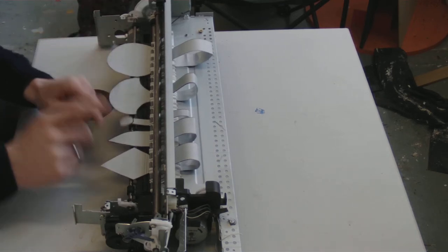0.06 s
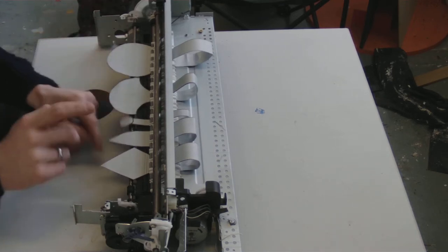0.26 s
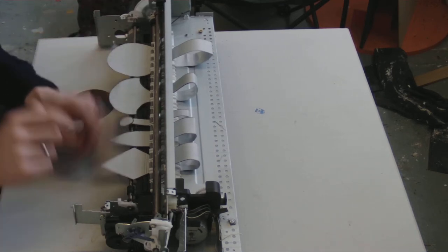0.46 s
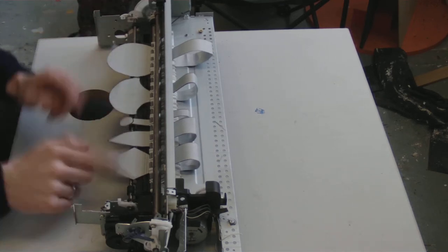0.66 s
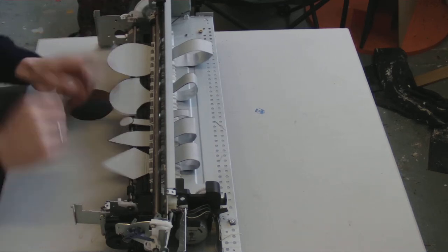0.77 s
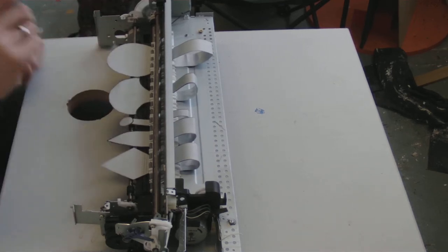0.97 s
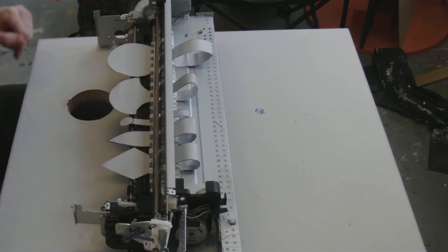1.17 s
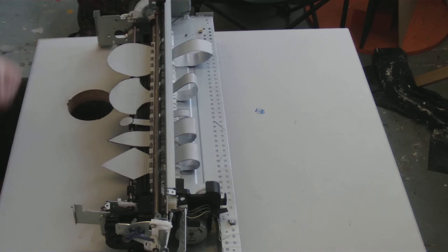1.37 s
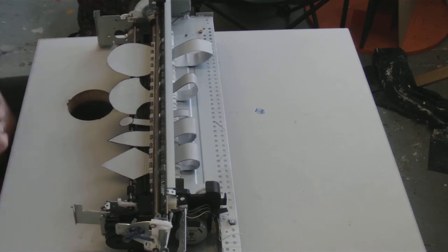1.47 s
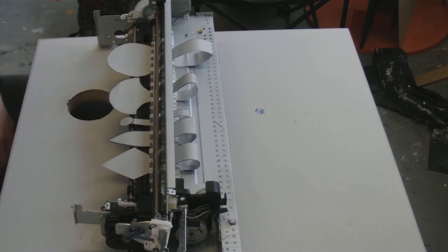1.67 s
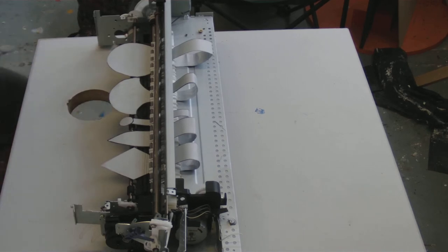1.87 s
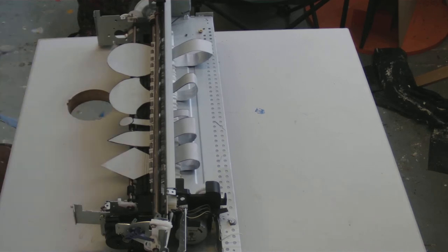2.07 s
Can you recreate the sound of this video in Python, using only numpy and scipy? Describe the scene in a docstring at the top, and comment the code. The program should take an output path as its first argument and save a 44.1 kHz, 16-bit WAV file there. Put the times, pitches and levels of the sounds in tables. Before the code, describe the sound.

Sharp clacking bursts from flicked paper and printer levers, ending in two hard metal knocks.

```python
"""Flicked paper on printer levers

Fingers flick stiff paper shapes fixed to the levers of a printer mechanism on a table.
Each flick sets off a quick rattle of dry clacks; the last ends in two knocks of the metal frame.
A spring sings faintly, low thumps accompany the hardest blows, and something ticks farther off.
A bare, quiet room answers, and the hardest clacks overload the microphone."""
import sys
import numpy as np
from scipy import signal
from scipy.fft import rfft, irfft, next_fast_len
from scipy.io import wavfile

SR = 44100
rng = np.random.default_rng(int(sys.argv[2]) if len(sys.argv) > 2 else 0)


def generate_wav(sig):
    """Save sig (samples, or channels by samples) to the path in sys.argv[1] as 16-bit PCM at SR."""
    pcm = np.round(np.clip(np.atleast_2d(sig).T, -1, 1) * 32767).astype(np.int16)
    wavfile.write(sys.argv[1], SR, pcm)


N = 92610

# (time [s], level [dB], rise [s], t60 [s], tilt [dB/octave], paper pitch [Hz], paper ring [dB])
LEVER_CLACKS = [ (.001, -30.5, 0.00015, 0.16, -3.5, 1200, -9), (.026, -27, 0.00062, .035, 5, 1750, -9),
                (0.0749, -25, 0.0014, 0.018, -0.5, 1750, -3), (.085, -18, 0.0005, 0.037, 2.5, 1750, 6),
                (.097, -29.5, 0.00064, 0.15, -2.5, 1170, -0.5),
                (0.1288, -25.5, 0.00082, 0.026, 4, 1200, -7), (.209, -16.5, 0.0033, .032, -2, 1030, -1),
                (.225, -13, 0.0015, .034, 1, 1640, 5), (.239, -11.5, 0.0014, .033, -1, 1220, 7),
                (.255, -14, 0.00098, 0.046, -2.5, 1880, -0.5), (0.319, -19.5, 0.0015, 0.026, 0, 1200, 2),
                (.338, -30, 0.0017, .09, 1.5, 1200, -5), (.366, -28, 0.00073, 0.05, 2.5, 1750, -8),
                (.4441, -9, 0.0038, 0.024, -0.85, 1740, 10.5), (.459, -8, 0.00048, 0.031, 2.5, 1220, 0),
                (.464, -17, 0.0023, 0.071, -2.5, 960, -4), (0.4748, -3.5, 0.0018, 0.04, 1.6, 940, 3.5),
                (0.4932, -3.5, 0.0013, 0.024, -.5, 1730, 4.5), (0.5108, -13, .0012, 0.021, -1, 2300, -12),
                (.53, -24, .0012, 0.057, -2, 1150, -3), (0.5746, -20, 0.0042, 0.082, -2.5, 1170, 4),
                (.774, -3.5, 0.0032, 0.019, 0, 1777, 9.5), (.788, -1.5, 0.0045, 0.027, 2.5, 1250, -10),
                (0.8028, -4, 0.0014, 0.019, 0, 1230, 6.5), (0.8208, 0, 0.0014, 0.02, 0, 1700, 8),
                (.84, -9, 0.0011, 0.017, 0.5, 1630, 0), (.858, -20.5, 0.0011, 0.019, -6, 1650, -5)]
# contact spectrum (frequency [Hz], level [dB])
CLACK_SPECTRUM = [(60, -45), (220, -13.5), (400, -24), (700, -15.5), (2400, -8), (4500, .5), (7500, 3.5),
                  (12000, -2), (15000, -7.5)]


def levers():
    """The flicked shapes and their levers clack and rebound, each followed by a short reverberation."""
    return sum(in_room(contact(strike, CLACK_SPECTRUM, clack_modes(paper_hz, paper_db)))
               for *strike, paper_hz, paper_db in LEVER_CLACKS)


# resonances of the shapes on their levers (frequency [Hz], width [Hz], level [dB])
LEVER_MODES = [(966, 58, -5), (1190, 120, -6), (1780, 320, -6.5), (2920, 310, -7), (4205, 560, 3),
               (4950, 99, -.5), (6370, 370, 1)]
# bending modes of a shape (frequency [x paper pitch], width [x frequency], level [dB])
PAPER_MODES = [(1, 0.1, 0.5), (2.8, 0.06, -6)]


def clack_modes(paper_hz, paper_db, lever_ring_db=4.5, pitch_spread=0.021, spread_db=0.5):
    """Lever and paper resonances; the lever's shift because each contact lands differently."""
    modes = []
    for hz, width_hz, db in LEVER_MODES:
        detune = 1 + pitch_spread * rng.standard_normal()
        modes.append((hz * detune, width_hz, db + lever_ring_db + spread_db * rng.standard_normal()))
    for multiple, width_share, db in PAPER_MODES:
        hz = paper_hz * multiple
        modes.append((hz, hz * width_share, paper_db + db))
    return modes


# (time [s], level [dB], rise [s], t60 [s], tilt [dB/octave], ring [dB])
FRAME_KNOCKS = [(.878, 1, 0.002, 0.031, 1, 5.5), (.890, -15, 0.003, 0.053, -0.5, -6),
                (0.9157, -5.5, 0.0024, 0.038, -0.37, -2)]
# (frequency [Hz], width [Hz], level [dB])
FRAME_MODES = [(662, 80, -1), (766, 68, -2), (1410, 390, -2), (2764, 160, 0), (3210, 100, 0.5),
               (7140, 170, 2), (9850, 2100, -2)]
# contact spectrum (frequency [Hz], level [dB])
KNOCK_SPECTRUM = [(60, -20.5), (220, -11), (420, -25), (1050, -7.5), (2000, -.5), (4500, 0.5), (9000, 3.5),
                  (15000, -11)]


def frame(ring_boost_db=2.5):
    """Two hard knocks, with a small rebound between them, ring the metal frame."""
    knocks = np.zeros(N)
    for *strike, ring_db in FRAME_KNOCKS:
        modes = [(hz, width_hz, db + ring_boost_db + ring_db) for hz, width_hz, db in FRAME_MODES]
        knocks += in_room(contact(strike, KNOCK_SPECTRUM, modes))
    return knocks


def contact(strike, spectrum, modes=(), size=8192):
    """A burst of fine chatter swells, dies and rings the body's resonances."""
    start_s, level_db, rise_s, t60_s, tilt_db_per_octave = strike
    t, hz = np.arange(size) / SR, np.fft.rfftfreq(size, 1 / SR)
    chatter = envelope(t, rise_s, t60_s) * rng.standard_normal(size)
    ring_power = sum((amp(db) * hz * width_hz) ** 2 / ((hz ** 2 - mode_hz ** 2) ** 2 + (hz * width_hz) ** 2)
                     for mode_hz, width_hz, db in modes)
    octaves = np.log2(np.maximum(hz, 800) / 5000)
    tilt = amp(tilt_db_per_octave * octaves)
    gain = unit_rms(np.sqrt(amp(curve_at(spectrum, hz)) ** 2 + ring_power) * tilt)
    sound = irfft(rfft(chatter) * minimum_phase(gain))
    return amp(level_db) * np.pad(sound, (round(start_s * SR), N))[:N]


# (time [s], level [dB])
SPRING_FLICKS = [(0.226, -44), (.459, -44)]


def spring():
    """A lever spring sings faintly on after two of the flicks."""
    return sum(damped_mode(start_s, db, rise_s=0.012, t60_s=0.59, hz=958) for start_s, db in SPRING_FLICKS)


# (time [s], level [dB], rise [s], t60 [s], pitch [Hz])
LOW_THUMPS = [(0.321, -47, 0.029, 0.41, 75), (.59, -54, .02, 1, 142), (.821, -38, .002, .06, 130),
              (0.877, -29.5, 0.0031, 0.025, 106), (.935, -46, 0.018, 0.23, 72)]


def low_thumps():
    """Faint booms lie under the rattle; short low thumps accompany the hardest blows."""
    return sum(damped_mode(*thump) for thump in LOW_THUMPS)


def damped_mode(start_s, level_db, rise_s, t60_s, hz):
    """One mode swells and dies away."""
    t = np.maximum(np.arange(N) / SR - start_s, 0)
    return amp(level_db) * envelope(t, rise_s, t60_s) * np.sqrt(2) * np.sin(2 * np.pi * hz * t)


# a tick, then a soft scrape (time [s], level [dB], rise [s], t60 [s], tilt [dB/octave])
FAR_CONTACTS = [(1.609, -35, .0006, .025, 0), (1.64, -52, .035, .25, 0)]
# (frequency [Hz], level [dB])
TICK_SPECTRUM = [(100, -10), (750, 1.5), (1800, -16), (3700, 1.5), (6500, 0.5), (9500, -11), (15000, -19)]


def far_tick(room_gain_db=8):
    """Something small stirs farther off, heard mostly through the room."""
    tick = sum(contact(strike, TICK_SPECTRUM) for strike in FAR_CONTACTS)
    return in_room(tick, room_gain_db)


# room decay (frequency [Hz], t60 [s])
TAIL_T60 = [(150, 0.57), (900, 0.95), (3700, 0.63), (8000, 0.56), (14000, 0.37)]
# (frequency [Hz], level [dB])
TAIL_SPECTRUM = [(150, 7.5), (750, 3), (2000, -2), (5000, -.5), (9000, -7.5), (14000, -5.5)]


def in_room(direct, room_gain_db=0):
    """Direct sound, first answers of near walls, then a diffuse tail whose treble dies soonest."""
    walls_db, walls_delay_s, walls_t60_s = -9, 0.0095, 0.16
    tail_db, tail_delay_s, tail_rise_s = -10.5, 0.011, 0.0046
    t = np.arange(SR) / SR
    hz, slice_s, noise = signal.stft(rng.standard_normal(SR), SR, nperseg=256)
    fade = amp(curve_at(TAIL_SPECTRUM, hz)[:, None] - 60 * slice_s / curve_at(TAIL_T60, hz)[:, None])
    tail = signal.istft(noise * fade, SR, nperseg=256)[1][:SR]
    tail *= np.clip((t - tail_delay_s) / tail_rise_s, 0, 1)
    walls = rng.standard_normal(SR) * (t > walls_delay_s) * amp(-60 * t / walls_t60_s)
    response = amp(tail_db) * tail / np.linalg.norm(tail) + amp(walls_db) * walls / np.linalg.norm(walls)
    return direct + amp(room_gain_db) * signal.fftconvolve(direct, response)[:N]


# (frequency [Hz], level [dB])
AIR_SPECTRUM = [(45, -5.5), (72, -0.5), (110, -5), (280, -7.5), (700, -14.5), (5000, -16), (15000, -19)]


def air(level_db=-47):
    """Low room rumble and steady hiss."""
    noise = filtered(rng.standard_normal(N), lambda hz: amp(curve_at(AIR_SPECTRUM, hz)))
    return amp(level_db) * unit_rms(noise)


def envelope(t, rise_s, t60_s):
    """Linear rise, exponential decay."""
    return np.minimum(t / rise_s, 1) * amp(-60 * np.maximum(t - rise_s, 0) / t60_s)


def amp(db):
    """Decibels to gain."""
    return 10 ** (np.asarray(db) / 20)


def unit_rms(x):
    """Scale to rms 1."""
    return x / np.sqrt(np.mean(np.abs(x) ** 2) + 1e-20)


def curve_at(points, hz):
    """Interpolate (frequency, value) points on a log frequency axis."""
    point_hz, values = np.transpose(points)
    return np.interp(np.log(hz + 1), np.log(point_hz + 1), values)


def minimum_phase(gain):
    """Causal frequency response with the given gain."""
    cepstrum = irfft(np.log(np.maximum(gain, 1e-6)))
    half = len(cepstrum) // 2
    return np.exp(rfft(np.concatenate([cepstrum[:1], 2 * cepstrum[1:half], np.zeros(half)])))


def filtered(x, gain_at):
    """Zero-phase filter; gain_at maps frequency to gain."""
    size = next_fast_len(N + SR // 2)
    return irfft(rfft(x, size) * gain_at(np.fft.rfftfreq(size, 1 / SR)), size)[:N]


def scene():
    """The mechanism close by, a far tick and the room, in mono."""
    return (levers() + spring() + frame() + far_tick() + low_thumps() + air())[None]


def record(dry):
    """The microphone clips the loudest peaks; a steep low-pass follows."""
    ceiling, hardness, cutoff_hz = 0.93, 3.4, 15350
    clipped = dry[0] / (1 + np.abs(dry[0] / ceiling) ** hardness) ** (1 / hardness)
    return filtered(clipped, lambda hz: 1 / np.sqrt(1 + (hz / cutoff_hz) ** 300))[None]


dry = scene()
out = record(dry)
generate_wav(out)
```